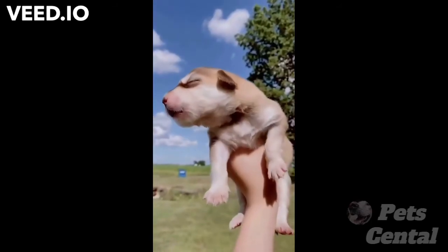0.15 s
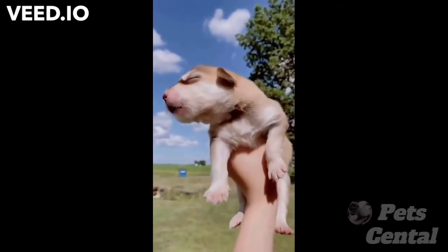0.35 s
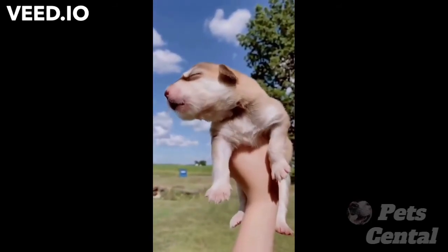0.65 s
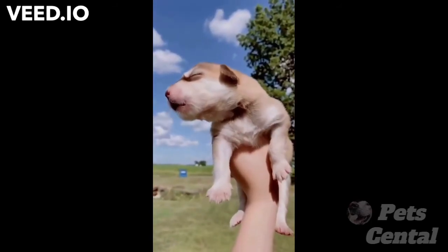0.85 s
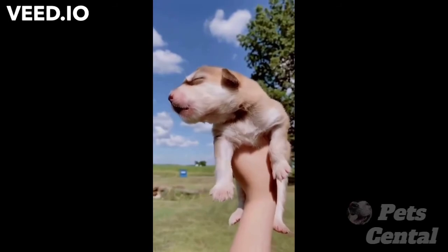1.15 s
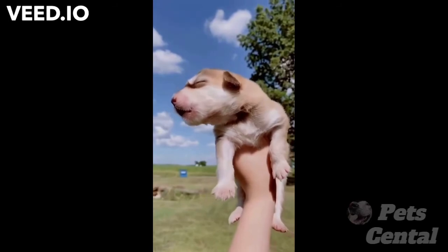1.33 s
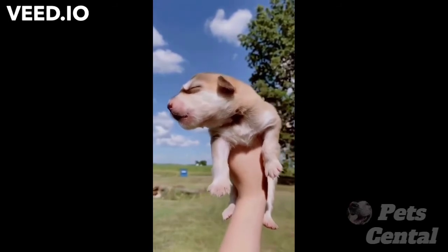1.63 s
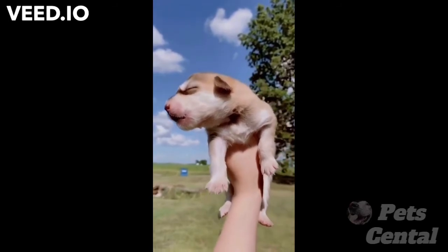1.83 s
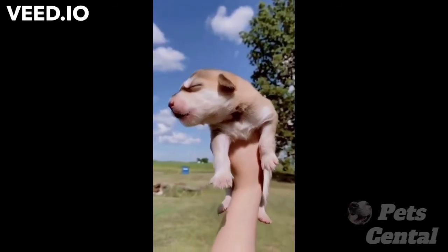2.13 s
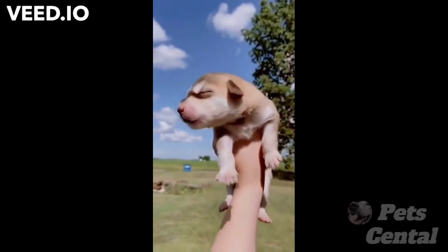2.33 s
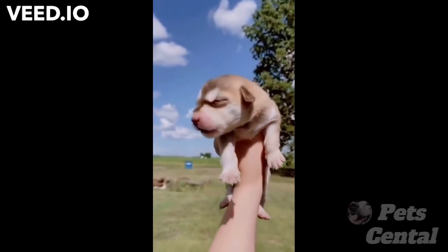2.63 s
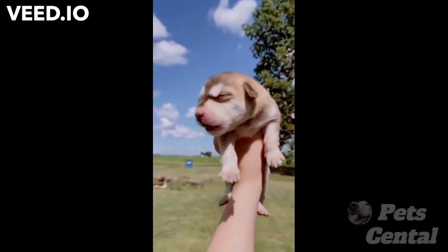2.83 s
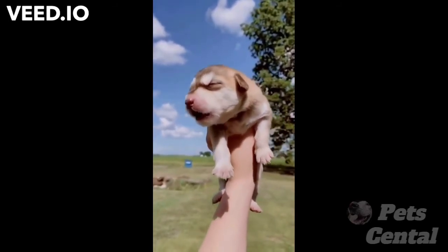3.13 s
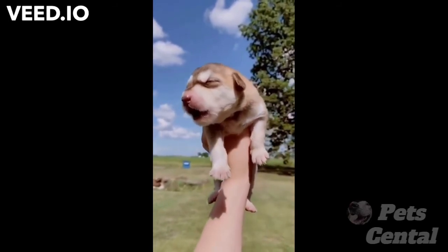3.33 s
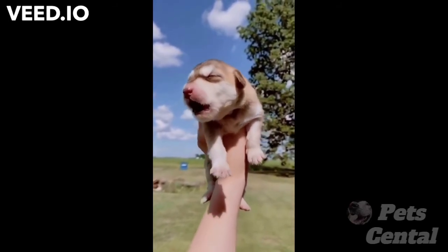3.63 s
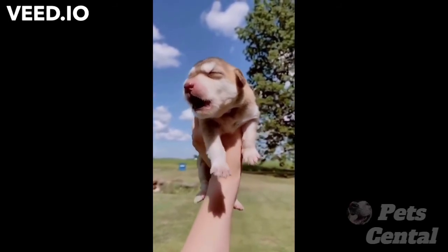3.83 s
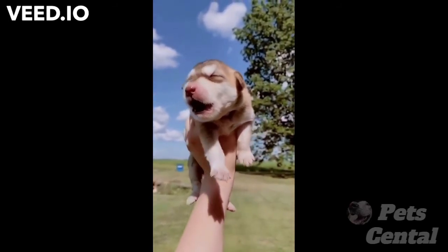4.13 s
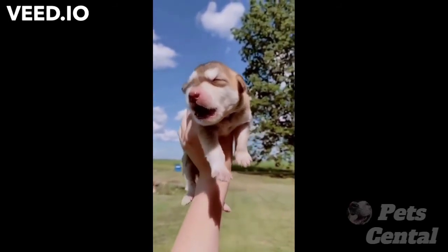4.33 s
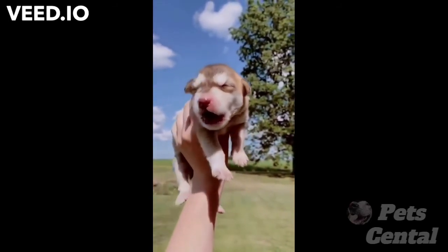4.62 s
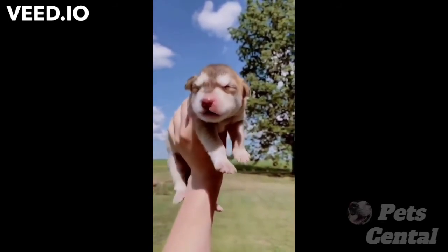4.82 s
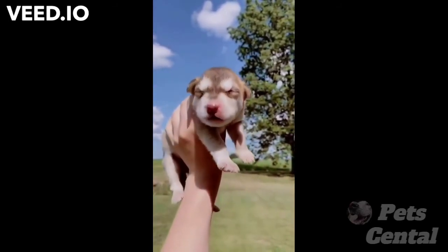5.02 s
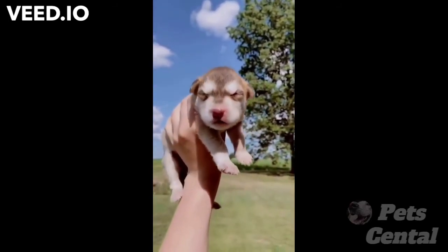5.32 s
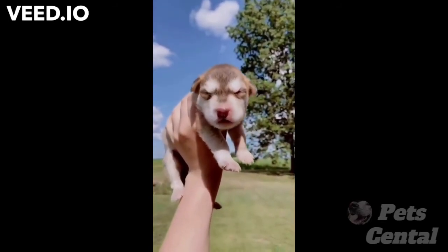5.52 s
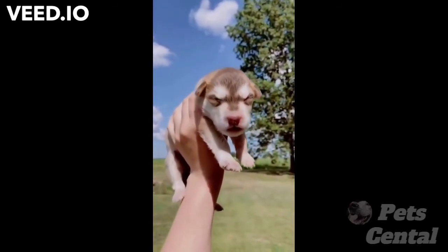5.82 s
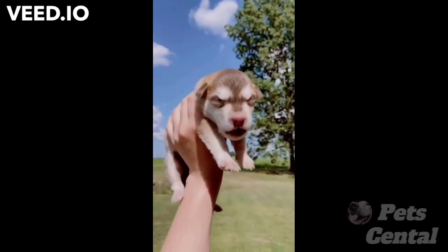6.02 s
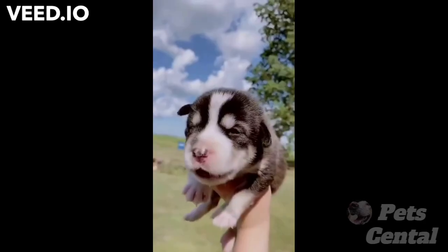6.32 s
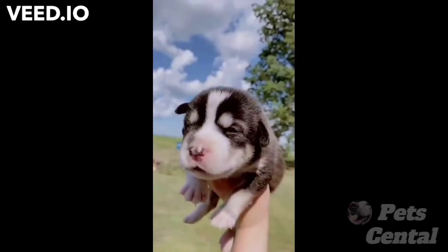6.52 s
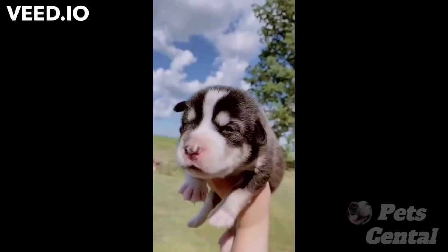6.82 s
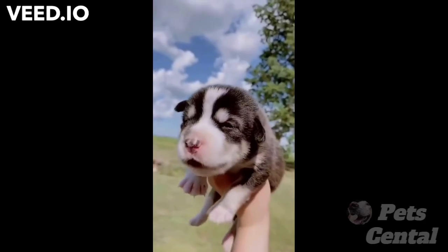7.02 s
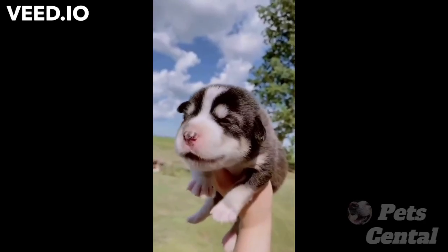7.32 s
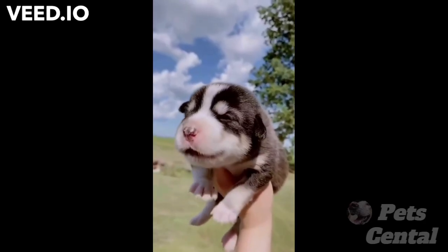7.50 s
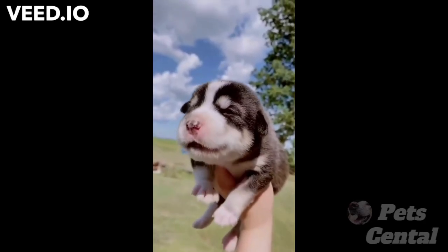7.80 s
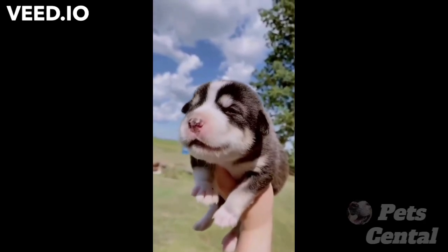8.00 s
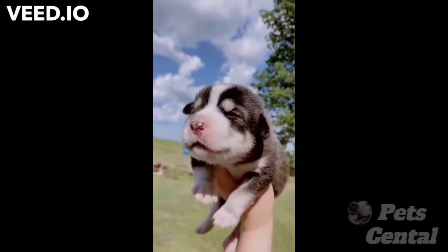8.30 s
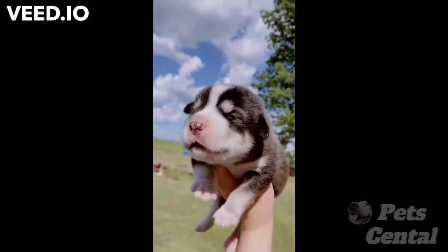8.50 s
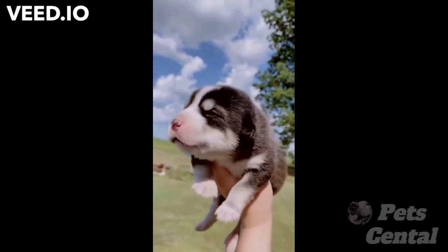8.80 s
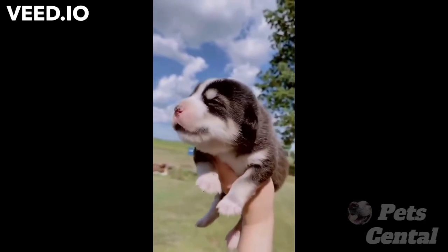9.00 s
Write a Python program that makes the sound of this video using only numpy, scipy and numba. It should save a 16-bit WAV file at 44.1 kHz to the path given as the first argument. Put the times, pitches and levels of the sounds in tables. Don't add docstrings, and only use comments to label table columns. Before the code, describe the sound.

Close outdoor phone sound: high, quivering baby-dog howls with cracks and raspy edges. The first puppy wails downward, yips, howls again, closes its mouth with a wet tick, then grumbles and creaks. A short gap, and the second gives brighter yelps and a falling howl, ending on a rising yelp. Bumpy low wind and faint leaf hiss lie beneath, calmer after the change.

```python
import sys
import numpy as np
from scipy import signal
from scipy.fft import rfft, irfft, next_fast_len
from scipy.io import wavfile
from scipy.ndimage import uniform_filter1d, map_coordinates
from numba import njit

SR = 44100
rng = np.random.default_rng(int(sys.argv[2]) if len(sys.argv) > 2 else 0)


def invert_db(x):
    u = np.asarray(x, float) / 20
    return 10 ** u


def wav_record(signal):
    frames = np.transpose(np.atleast_2d(signal))
    bounded = np.clip(frames, -1, 1)
    quanta = np.round(bounded * 32767).astype(np.int16)
    wavfile.write(sys.argv[1], SR, quanta)


N = 403515
SWAP_S, RAISE_S = 6.2, 8.55

# t/s, level/dB
BUFFET = [(1.15, -48.5), (1.3, -25), (1.6, -41.5), (1.95, -30), (3.0, -29), (3.7, -27), (4.6, -27.5),
          (5.95, -27.5), (6.1, -37.5), (6.25, -47), (6.6, -34.5), (7.1, -45), (8.2, -39), (8.6, -43.5)]


def unit(x):
    return x / np.sqrt(np.mean(x ** 2) + 1e-20)


def curves(rows):
    s, *cols = np.transpose(rows)
    return [np.interp(np.arange(N) / SR, s, c) for c in cols]


def wobble(rate_hz):
    knots = rng.standard_normal(int(N * rate_hz / SR) + 4)
    return map_coordinates(knots, [np.arange(N) * rate_hz / SR])


def coloured(x, spectrum):
    m = next_fast_len(N + 8192)
    hz, db = np.transpose(spectrum)
    log_hz = np.log(np.fft.rfftfreq(m, 1 / SR) + 1)
    return irfft(rfft(x, m) * invert_db(np.interp(log_hz, np.log(hz), db)), m)[:N]


def levelled(x, seconds):
    size = int(seconds * SR)
    power = uniform_filter1d(uniform_filter1d(x ** 2, size), size)
    return x / np.sqrt(np.abs(power) + 1e-20)


@njit
def two_pole(x, a, b):
    y = np.zeros(len(x))
    for i in range(2, len(x)):
        y[i] = (1 - a[i] + b[i]) * x[i] + a[i] * y[i - 1] - b[i] * y[i - 2]
    return y


def resonance(x, hz, width_hz):
    r = np.exp(-np.pi * width_hz / SR) + 0 * x
    return two_pole(x, 2 * r * np.cos(2 * np.pi * hz / SR), r * r)


def air():
    # f/Hz, level/dB per Hz
    floor = [(180, -5.5), (300, -11.5), (804, -21.5), (942, -21), (2450, -26.5), (4330, -36), (5410, -42),
             (7210, -44.5), (13400, -51.5)]
    buffet_db, = curves(BUFFET)
    slow_db = uniform_filter1d(buffet_db, SR // 2) + 40
    calm_db = np.where(np.arange(N) < SWAP_S * SR, -52.5, -49)
    level_db = calm_db + 0.43 * slow_db + 1.5 * wobble(8)
    return invert_db(level_db) * unit(coloured(rng.standard_normal(N), floor))


def wind():
    # f/Hz, level/dB per Hz
    rumble = [(13, -25), (22, -28.5), (49, 6), (75, 0), (141, -8), (246, -25), (330, -34.5), (430, -62.5),
              (730, -120)]
    # t/s, peak level/dB, ring f/Hz
    thumps = [(1.381, -15.5, 87), (1.966, -10.5, 89.7), (2.031, -11.5, 76.9), (2.449, -12, 63.8),
              (2.865, -15.5, 71), (3.086, -11, 53), (3.714, -11, 106), (5.408, -10.5, 72.7),
              (6.86, -23, 88), (7.033, -18, 86)]
    # t/s, peak level/dB, ring f/Hz
    more_thumps = [(1.284, -27, 66), (1.468, -24, 85.8), (1.7, -21, 75), (1.779, -22, 68), (1.92, -18, 71),
                   (2.17, -14.5, 55), (2.398, -19, 68.3), (2.721, -13, 81), (2.789, -14.5, 54.4),
                   (3.329, -20.5, 71), (3.468, -19.5, 73.8), (3.828, -12, 75), (4.018, -10.5, 49.2),
                   (4.149, -15, 70), (4.28, -17, 70.8), (4.448, -16.5, 68.15), (4.617, -31, 68.6),
                   (4.997, -14.5, 49.4), (5.326, -15, 71.17), (5.549, -14, 55.45), (5.66, -15, 69.37),
                   (5.728, -19, 103.3), (5.809, -19.5, 104.5), (5.872, -18, 62.23)]
    buffet_db, = curves(BUFFET)
    lumps = invert_db(3.6 * wobble(14) + 5.85 * wobble(40))
    out = invert_db(buffet_db + 0.5) * levelled(coloured(lumps * rng.standard_normal(N), rumble), 0.12)
    t = np.arange(SR // 6) / SR
    for s, db, hz in thumps + more_thumps:
        cycles = hz * (t + 0.0063 * (1 - np.exp(-t / 0.0034)))
        ring = invert_db(db - 1.5 - 60 * t / 0.23) * (1 - np.exp(-t / 0.0041)) * np.sin(2 * np.pi * cycles)
        out[round(s * SR):][:len(t)] -= ring
    return out


def smacks():
    # t/s, peak level/dB, t60/s
    ticks = [
        (4.581, -35, 0.024),
        (4.597, -52.5, .03),
        (6.8309, -45, 0.065),
    ]
    out, t = np.zeros(N), np.arange(SR // 50) / SR
    for s, db, t60_s in ticks:
        out[round(s * SR):][:len(t)] += invert_db(db + 10.5 - 60 * t / t60_s) * rng.standard_normal(len(t))
    return coloured(out, [(300, -28), (2600, 7.0), (3400, -11.0), (5500, -9.5), (9000, -23.0)])


def calling():
    # start t/s, end t/s
    spans = [
        (0, 2.13),
        (2.51, 4.575),
        (5.064, 6.145),
        (6.32, 6.835),
        (7.1, 8.255),
        (8.62, 9.15),
    ]
    t = np.arange(N) / SR
    return sum(np.clip(np.minimum(t - a + (a == 0), b - t + (b > t[-1])) / 0.015, 0, 1) for a, b in spans)


def pitch():
    # t/s, pitch f/Hz, tremble rate f/Hz
    howl_1 = [(0.0, 941, 24.8), (0.2, 891, 23.2), (0.42, 797, 23.8), (0.52, 729.5, 24.0), (0.65, 725, 19.8),
              (0.8, 632.6, 21.9), (1.02, 574, 25), (1.3, 516, 22.2), (1.6, 444.4, 15)]
    howl_1_tail = [(1.599, 442.3, 20), (1.8, 429, 18.1), (2.151, 312.5, 19.5)]
    yip = [(2.53, 406, 25.4), (2.59, 607.6, 28.3), (2.67, 419, 12.9), (2.737, 438, 19.7), (2.819, 427, 24)]
    howl_2 = [(2.82, 493.1, 22.3), (3.0, 807.4, 24.2), (3.08, 886.4, 22.2), (3.18, 844.5, 21.4),
              (3.31, 810.9, 18.5), (3.34, 742.7, 25.6), (3.47, 768.1, 18.2), (3.5, 864.7, 22.7),
              (3.835, 827.2, 15.9)]
    howl_2_fall = [(3.851, 739, 17.8), (3.972, 724, 21.2), (4.058, 671, 12.6), (4.119, 579.7, 28),
                   (4.185, 552, 29), (4.2, 502.4, 22.4), (4.393, 394, 18), (4.4, 433, 12.9),
                   (4.58, 412.2, 25.4)]
    grumble = [(5.069, 362, 18.2), (5.159, 374.2, 20), (5.217, 480, 20.5), (5.232, 387, 16.4),
               (5.28, 325, 19), (5.291, 676.4, 20), (5.341, 482.6, 20), (5.43, 285, 20), (5.5, 252, 19.1),
               (5.58, 228.8, 17.6)]
    creak = [(5.602, 156.8, 20), (5.97, 180.6, 20), (6.145, 182, 14)]
    yelp_1 = [(6.329, 632, 15.6), (6.383, 563.4, 31), (6.43, 609, 19.7), (6.489, 840, 23.3),
              (6.548, 687.2, 16.6), (6.599, 765.4, 23.6), (6.682, 693, 19), (6.76, 657.5, 21),
              (6.829, 494.7, 11.6)]
    howl_3 = [(7.111, 515.9, 29.94), (7.181, 734.3, 24.97), (7.249, 1025, 26.8), (7.32, 972.3, 22.46),
              (7.381, 1111, 25.2), (7.48, 1047, 25.8), (7.6, 1080, 22.83), (7.719, 1000, 21.7),
              (7.908, 915.5, 19.76)]
    howl_3_fall = [(7.931, 800, 13), (8.0, 709.6, 24), (8.042, 614, 19.0), (8.108, 600.4, 19.3),
                   (8.181, 494.4, 21), (8.251, 371.4, 23)]
    yelp_2 = [(8.62, 586.6, 22), (8.699, 696.4, 22.1), (8.782, 676, 13.9), (8.86, 657.7, 20),
              (8.919, 780, 24.8), (8.966, 787.5, 23), (8.984, 905, 25), (9.012, 943, 29), (9.072, 1030, 20),
              (9.14, 1049, 21)]
    tremble = [(.79, 5.15, 1.85, 2.33), (0.0065, 3.9, 5, 2), (0.34, 4.4, 0.63, 13), (0.92, 5.4, 2.6, 2.4),
               (0.55, 0.62, 0.9, 3.2), (0.12, 0.64, 1.5, 2.3), (0.055, 2.7, 0.65, 0.36),
               (0.12, 4.4, 7.4, 1.5), (0.27, 5.2, 7.1, 3.5), (0.57, 1.4, 1.1, 2.4), (0.47, 3.6, 4, 5.4)]
    tongue_shake = [(1.1, 0.61), (.6, 0.33), (.6, .45), (1.1, 0.42), (.6, 0.84), (.6, 0.61), (.6, 0.52),
                    (.6, .45), (.6, 0.39), (.6, 0.48), (.6, 0.23)]
    # t/s, dip/%
    catches = [
        (3.673, 8.5),
        (3.722, 4),
        (6.32, -36),
    ]
    catch_s, slide_s, flutter_lead_turns = .011, .008, 0.15
    phrases = [howl_1, howl_1_tail, yip, howl_2, howl_2_fall, grumble, creak,
               yelp_1, howl_3, howl_3_fall, yelp_2]
    t, since = np.arange(N) / SR, -1
    hz, swing, shake = np.zeros(N), np.zeros(N), np.zeros(N)
    for rows, (turns, *depths), (share, lead) in zip(phrases, tremble, tongue_shake):
        melody, rate = curves(rows)
        depth = np.interp(t, np.linspace(rows[0][0], rows[-1][0], len(depths)), depths)
        cycles = np.cumsum(rate) / SR
        cycles += turns - np.interp(rows[0][0], t, cycles)
        now = t > since
        hz = np.where(now, melody * (1 + depth / 100 * np.cos(2 * np.pi * cycles)), hz)
        swing = np.where(now, depth * np.cos(2 * np.pi * (cycles + flutter_lead_turns)), swing)
        shake = np.where(now, share * depth / 100 * np.cos(2 * np.pi * (cycles + lead)), shake)
        since = rows[-1][0] + (.02 if rows is grumble else 0)
    dip = sum(d / 100 * np.exp(-((t - s) / catch_s) ** 2) for s, d in catches)
    hz = uniform_filter1d(hz, int(slide_s * SR)) * (1 - dip)
    return hz * (1 + 0.0037 * wobble(60)), swing, shake


def regularity(strain):
    # start t/s, end t/s, every second pulse weaker/0-1, roughness/0-1 at start, at end
    breaks = [(1.605, 1.69, .65, .06, .14), (1.7, 1.79, .55, .2, .28), (1.8, 1.95, .15, .12, .3),
              (1.85, 1.858, .3, .3, .3), (1.903, 1.912, .3, .35, .35), (1.96, 2.13, .3, .6, .8),
              (2.5, 2.555, 0, .7, .2), (2.66, 2.74, .1, .07, .09), (2.755, 2.815, .2, .22, .22),
              (4.07, 4.33, .6, .03, .08), (4.35, 4.39, .55, .15, .3), (4.44, 4.55, .3, .4, .3),
              (5.07, 5.14, 0, .9, .6), (5.17, 5.34, .12, .17, .17), (5.36, 5.41, .35, .22, .18),
              (5.43, 5.59, 0, .12, .09), (5.61, 5.73, .1, .35, .25), (5.75, 5.93, .2, .18, .12),
              (5.96, 6.145, .25, .08, .18), (6.325, 6.34, .2, .3, .15)]
    t = np.arange(N) / SR
    halving, rough = np.zeros(N), .008 + .08 * np.clip(strain, 0, 1) ** 2
    for a, b, half, first, last in breaks:
        inside = np.clip(np.minimum(t - a, b - t) / .02 + 1, 0, 1)
        halving = halving + inside * half
        rough = np.maximum(rough, inside * np.interp(t, [a, b], [first, last]))
    return halving, rough


def folds(hz, strain, breath_db, hiss_db):
    pair_s, pair_scatter_s = .0022, .0005
    creak_s, creak_pairs = [5.6, 5.6 + .22], (.2, .92)
    creak_breath = .36
    halving, rough = regularity(strain)
    hz = hz * (1 + .2 * rough * wobble(40) * (hz > 200))
    phase = np.cumsum(hz) / SR
    count = np.arange(1, int(phase[-1]))
    at = np.interp(count, phase, np.arange(N))
    here, chance = at.astype(int), rng.standard_normal((len(at), 3))
    pulse_hz = hz[here]
    at = at + 0.087 * rough[here] * chance[:, 0] * SR / pulse_hz
    size = (1 + halving[here] * (-1.) ** count) * invert_db(3.5 * rough[here] * chance[:, 1])
    size = size / np.sqrt(pulse_hz / SR)
    paired = (pulse_hz < 200) * (count % 2 == 1) * np.interp(at / SR, creak_s, creak_pairs)
    late_s = paired * (1 / pulse_hz - pair_s - pair_scatter_s * chance[:, 2])
    at = np.clip(at + late_s * SR, 8, N - 10)
    taps = np.floor(at)[:, None] + np.arange(-7, 9)
    away = taps - at[:, None]
    shape = size[:, None] * np.sinc(away) * np.cos(away * np.pi / 16) ** 2
    pulses = np.bincount(taps.astype(int).ravel(), shape.ravel(), N)
    puffs = unit(np.exp(-12 * (phase % 1 - .3) ** 2) * rng.standard_normal(N))
    clear = np.sqrt(1 - rough ** 2) * pulses
    clear = clear + creak_breath * (hz < 200) * rng.standard_normal(N)
    source = clear + (.45 * rough + invert_db(breath_db)) * puffs
    hiss = unit(puffs + .7 * rng.standard_normal(N))
    return source, clear + np.minimum(3 * rough + invert_db(hiss_db), 2) * hiss


def mouth():
    # t/s, voice level/dB, strain/0-1, jaw resonance f/Hz, tongue resonance f/Hz
    mouth_1 = [(0.012, -27, 0.04, 930, 2400), (0.384, -27, 0.18, 1085, 2000),
               (0.516, -20, 0.01, 1380, 1720), (0.636, -21.5, 0.13, 1360, 1750),
               (0.77, -29.5, 0.41, 1040, 2055), (0.948, -33, 0.46, 890, 2200),
               (1.224, -24.5, 0.05, 1300, 1640), (1.464, -26.5, 0.05, 872, 1640)]
    mouth_1_tail = [(1.619, -28.5, .05, 980, 1690), (1.671, -30.5, 0.075, 1067, 1700),
                    (1.77, -30.5, 0.095, 1028, 1750), (1.82, -28.5, 0.11, 880, 1620),
                    (1.85, -34.5, 0.12, 1064, 1551), (1.88, -28, 0.12, 869, 1507),
                    (1.91, -34.5, .1, 1060, 1780), (1.935, -30, 0.11, 880, 1590),
                    (2.03, -37.5, 0.22, 930, 1830), (2.114, -37.5, .25, 960, 1920)]
    mouth_yip = [(2.531, -43, 0.7, 850, 1753), (2.555, -16.5, 0.67, 746, 1876),
                 (2.575, -17, 0.78, 900, 2063), (2.6, -18, 0.81, 967, 2115), (2.663, -25, 0.54, 760, 1880),
                 (2.757, -28.5, 0.75, 740, 1800), (2.851, -24, .28, 966, 1720)]
    mouth_2 = [(2.892, -32, 0.33, 860, 1747), (3.025, -18.5, 0.086, 1100, 1635),
               (3.06, -22.5, 0.054, 920, 2007), (3.229, -19, 0.12, 1110, 1723),
               (3.386, -25, 0.273, 1105, 1870), (3.552, -22, 0.091, 1087, 2020),
               (3.78, -24, .12, 1120, 1990)]
    mouth_2_fall = [(3.924, -27.5, 0.31, 1150, 1935), (4.08, -27, .3, 936, 2017),
                    (4.16, -28.5, 0.33, 850, 2065), (4.28, -29, 0.39, 1074, 2130),
                    (4.38, -29.5, .39, 970, 1926), (4.428, -27.5, 0.34, 890, 2118),
                    (4.5, -29.5, 0.29, 978, 2048), (4.56, -33, 0.41, 814, 2213)]
    mouth_grumble = [(5.077, -34, 0.06, 870, 1120), (5.128, -27.5, 0.3, 850, 1180),
                     (5.137, -28.5, 0.46, 950, 2430), (5.149, -26, 0.74, 1040, 2499),
                     (5.171, -19, 0.88, 1100, 2755), (5.212, -20, 0.81, 1316, 2678),
                     (5.273, -23, 0.82, 1120, 2440), (5.34, -24.5, 0.6, 1020, 2156),
                     (5.429, -28.5, 0.55, 1080, 2330), (5.592, -27, 0.47, 1001, 2140)]
    mouth_rattle = [(5.62, -29, 0.55, 1026, 2151), (5.706, -29.5, 0.38, 985, 2199),
                    (5.886, -31.5, 0.57, 935.6, 2240), (6.0, -29.5, .5, 965, 2404),
                    (6.08, -28.5, 0.67, 1072, 2480), (6.136, -27, 0.58, 1000, 2560)]
    mouth_yelp_1 = [(6.335, -23, 0.73, 1620, 2667), (6.387, -17, 0.84, 1850, 2580),
                    (6.505, -15.5, 0.74, 1470, 2760), (6.564, -20.5, 0.77, 1330, 2467),
                    (6.602, -19, 0.65, 1180, 2347), (6.683, -24.5, 0.81, 1010, 2320),
                    (6.781, -20, 0.65, 960, 2544), (6.82, -23, 0.52, 707, 2270)]
    mouth_3 = [(7.113, -23, 0.59, 1528, 2980), (7.146, -13, 0.92, 1573, 2713),
               (7.266, -16, 0.5, 1516, 2167), (7.402, -28, 0.28, 1290, 2214),
               (7.436, -22, 0.24, 1340, 2540), (7.565, -21.5, 0.18, 976, 2130),
               (7.841, -19, 0.068, 923, 2290)]
    mouth_3_fall = [(7.928, -19, 0.23, 1100, 1880), (7.999, -18, 0.18, 1311, 1677),
                    (8.112, -22, 0.41, 1526, 1596), (8.192, -18.5, 0.24, 1030, 2057),
                    (8.239, -27.5, 0.45, 755, 2100)]
    mouth_yelp_2 = [(8.63, -13, 0.89, 1580, 2796), (8.705, -13.5, 0.69, 1410, 2410),
                    (8.812, -25, 0.72, 780, 2090), (8.873, -24.5, 0.45, 680, 2450),
                    (8.956, -13, 0.84, 1270, 2650), (9.019, -13, 0.57, 1230, 2023),
                    (9.086, -19.5, 0.28, 1000, 2660), (9.136, -20, 0.23, 920, 2710)]
    pressure = [(1.24, 1.78, 0.011, 0.034), (2.43, 0.49, 0.32, 0.1), (6.4, 2.4, 0.039, 0.042),
                (4.53, 2.25, 0.1, 0.087), (4.2, 0.58, 0.31, 0.22), (2.77, 0.65, 0.21, 0.15),
                (0.9, 0.43, 0.44, 0.4), (0.28, 2.56, 0.068, 0.026), (1.9, 0.69, 0.073, 0.025),
                (0.26, .3, 0.03, 0.046), (1.1, 2.36, 0.012, 0.085)]
    # f/Hz at start, f/Hz at end
    throat = [(2794, 3010), (2730, 2600), (2690, 2805), (2805, 2770), (2710, 2860), (2858, 2600),
              (2760, 2650), (2944, 2600), (2830, 3020), (2900, 2990), (2790, 2780)]
    mouths = [mouth_1, mouth_1_tail, mouth_yip, mouth_2, mouth_2_fall, mouth_grumble, mouth_rattle,
              mouth_yelp_1, mouth_3, mouth_3_fall, mouth_yelp_2]
    ends = []
    for rows, p, throat_hz in zip(mouths, pressure, throat):
        ends.append((rows[0][0], p[0], *p[2:], throat_hz[0]))
        ends.append((rows[-1][0], p[1], *p[2:], throat_hz[1]))
    return curves(sum(mouths, [])) + curves(ends)


def patchy(x, depth_db):
    z = signal.stft(x, nperseg=256)[2]
    field = uniform_filter1d(uniform_filter1d(rng.standard_normal(z.shape), 4, 0), 14, 1)
    return signal.istft(z * invert_db(depth_db * unit(field)), nperseg=256)[1][:N]


def build_up(x, hz, width_hz):
    return resonance(x[::-1].copy(), hz[::-1].copy(), width_hz)[::-1]


def pocket(x, strain):
    wide = .06
    band = []
    for hz in (3330, 3620):
        band.append(coloured(x, [(hz / (1 + 2 * wide), -30), (hz / (1 + wide), -1),
                                 (hz * (1 + wide), -1), (hz * (1 + 2 * wide), -30)]))
    return x - np.clip(2.6 * (strain - .3), 0, 1) * np.where(np.arange(N) < SWAP_S * SR, *band)


def puppies():
    # f/Hz, level/dB
    edge_away = [(1940, -54.5), (3300, -25.5), (3620, -13.5), (6070, -14.5), (7950, -13), (9540, -3),
                 (11100, -15), (12300, -18), (13400, -34.5)]
    # f/Hz, level/dB
    edge_facing = [(1940, -42), (3300, 3), (4200, -17.5), (5060, 0), (6590, -16), (7590, -9.5),
                   (10000, -4.5), (12300, -16.5), (13400, -29.5)]
    # f/Hz, level/dB
    edge_second = [(3300, -7), (3700, -9), (4400, -4.5), (5060, -3), (5600, -10), (6040, -23), (6600, -12),
                   (7860, -3.5), (8580, -8.5), (11200, -13.5), (12300, -25), (13400, -33)]
    # f/Hz, level/dB
    edge_raised = [(1940, -43), (3300, -12), (4220, -6.5), (4580, -6), (6070, -26), (7100, -13),
                   (7860, -0.5), (8940, -21), (12500, -26.5), (13400, -43)]
    overtone_band = [(2900, -39), (3400, 2.5), (4400, -4), (5300, -14), (5900, -34)]
    turn_s, overtone_db, overtone_breath = 4.8, -41, .55
    t = np.arange(N) / SR
    voice_db, strain, jaw_hz, tongue_hz, pressure, jaw_swing, tongue_swing, throat_hz = mouth()
    hz, swing, shake = pitch()
    tongue_hz = tongue_hz * (1 + np.clip(shake, -.3, .3))
    source, sharp = folds(hz, strain, breath_db=-55, hiss_db=3 - 17 * strain - 4 * (t > RAISE_S))

    overtones = coloured(source + overtone_breath * rng.standard_normal(N), overtone_band)
    overtones = patchy(levelled(overtones, 0.041), depth_db=5.5)
    overtones = invert_db(overtone_db) * (1 - np.clip(strain, 0, 1)) * overtones

    source = (source + np.abs(jaw_swing) * build_up(source, jaw_hz, width_hz=115)
              + np.abs(tongue_swing) * build_up(source, tongue_hz, width_hz=224))
    corner_hz = 150 * 2 ** np.clip(pressure + 0.81 * strain, -1, 6)
    pole = np.exp(-2 * np.pi * corner_hz / SR)
    voice = np.diff(two_pole(source, 2 * pole, pole * pole), prepend=0)
    jaw_width_hz = 373 * (1 - 0.3 * np.clip((300 - hz) / 80, 0, 1))
    tongue_width_hz = 360 * (1 + 0.35 * np.clip((260 - hz) / 60, 0, 1))
    voice = resonance(voice, jaw_hz, jaw_width_hz)
    voice = resonance(voice, tongue_hz, tongue_width_hz)
    voice = resonance(voice, throat_hz, width_hz=270)
    voice = coloured(voice, [(150, -4.0), (300, 7.0), (3050, 4.0), (3350, -2), (3900, -2.5),
                             (5000, 13.0), (6000, -10.5)])

    edge_db = -40 + 40 * strain
    edges = [coloured(sharp, [(2700, -79)] + shape)
             for shape in (edge_away, edge_facing, edge_second, edge_raised)]
    edge = np.choose((t > turn_s) * 1 + (t > SWAP_S) + (t > RAISE_S), edges)
    lower = coloured(edge, [(5900, 0), (6200, -60)])
    lower_db = np.clip(.6 * (edge_db + 18), -3, 2) + 1.5 * (jaw_hz - 1300) / 100
    edge = patchy(lower * invert_db(lower_db) + edge - lower, depth_db=4)

    voice = levelled(voice, 0.037)
    broken = np.clip(regularity(strain)[1] / .3, 0, 1)
    voice = (1 - broken) * patchy(voice, depth_db=1.3) + broken * patchy(voice, depth_db=2.5)
    mix = pocket(voice + overtones + invert_db(edge_db) * levelled(edge, 0.066), strain)
    return calling() * invert_db(voice_db + 0.227 * swing) * mix


def scene():
    near = puppies() + smacks()
    ground = invert_db(-22) * np.roll(near, 310)
    return (near + ground + wind() + invert_db(-2 * calling()) * air())[None]


def outline(z, size):
    power = uniform_filter1d(uniform_filter1d(np.abs(z) ** 2, size, 0), 7, 1)
    return np.sqrt(np.abs(power) + 1e-20)


def rebuilt(x):
    # start t/s, end t/s, low f/Hz, high f/Hz
    starved = [(2.61, 2.82, 10800, 11750), (2.66, 2.8, 7750, 8250), (5.21, 5.55, 10750, 11750),
               (5.2, 5.57, 6350, 6750), (6.38, 6.78, 11050, 11750), (6.4, 6.82, 5800, 6150),
               (6.39, 6.76, 3500, 3850), (6.54, 6.82, 12050, 13200), (7.3, 7.9, 8750, 9150),
               (7.34, 7.9, 3550, 3850), (8.73, 8.92, 5350, 6250), (9.04, 9.15, 8700, 9500),
               (2.57, 2.74, 3250, 3450), (8.65, 8.86, 3550, 3800), (8.74, 8.9, 11000, 13200)]
    # start t/s, end t/s, f/Hz, level/dB
    whistles = [
        (2.57, 2.83, 11886, -64),
        (5.16, 5.52, 11886, -66),
        (5.17, 5.56, 11197, -60),
        (6.4, 6.83, 11886, -58),
    ]
    copy_from_hz, copy_shift_hz = 8700, 22 * SR / 128
    fill_db, limit_db, starved_db = -8, 5, -30
    t = np.arange(N) / SR
    shifted = np.real(signal.hilbert(x, next_fast_len(N))[:N] * np.exp(2j * np.pi * copy_shift_hz * t))
    layers = np.array([x, shifted, rng.standard_normal(N)])
    hz, s, (z, copy, fill) = signal.stft(layers, SR, nperseg=256)
    fine = outline(z, size=5)
    gain = fine / outline(copy, size=5)
    gain = np.minimum(gain, invert_db(limit_db) * outline(z, size=13) / outline(copy, size=13))
    noise = invert_db(fill_db) * fine * unit(np.abs(fill)) * np.exp(1j * np.angle(fill))
    z = np.where(hz[:, None] > copy_from_hz, gain * copy + noise, z)
    for a, b, low_hz, high_hz in starved:
        inside = np.clip(np.minimum(s - a, b - s) / .02 + .5, 0, 1)
        z = z * invert_db(starved_db * np.outer((hz >= low_hz) & (hz <= high_hz), inside))
    tones = np.zeros(N)
    for a, b, tone_hz, db in whistles:
        swell = np.clip(np.minimum(t - a, b - t) / .02, 0, 1)
        tones += invert_db(db - 0.5) * swell * np.sin(2 * np.pi * tone_hz * t)
    return signal.istft(z, SR, nperseg=256)[1][:N] + tones * invert_db(2 * wobble(25))


def roll_off(x):
    return signal.sosfilt(signal.butter(12, 13200, fs=SR, output="sos"), x)


def record(dry):
    # start t/s, fall/s, hold/s, rise/s, depth/dB
    fades = [
        (6.151, .04, 0.033, 0.004, -43),
        (8.526, 0.012, 0.029, 0.00694, -35.5),
    ]
    t = np.arange(N) / SR
    fade_db = np.zeros(N)
    for s, fall_s, hold_s, rise_s, db in fades:
        fade_db += db * np.interp(t - s, np.cumsum([0, fall_s, hold_s, rise_s]), [0, 0.79, 0.51, 0.0048])
    return roll_off(rebuilt(dry[0])[None] * invert_db(fade_db))


dry = scene()
out = record(dry)
wav_record(out)
```